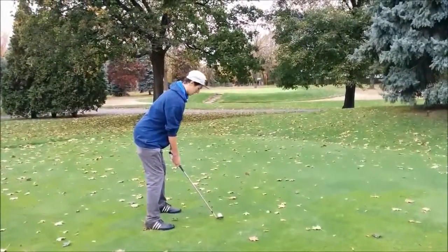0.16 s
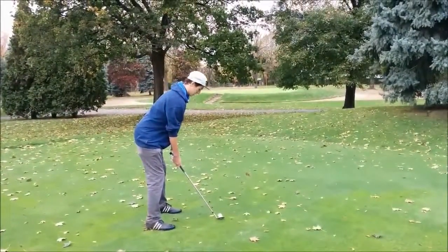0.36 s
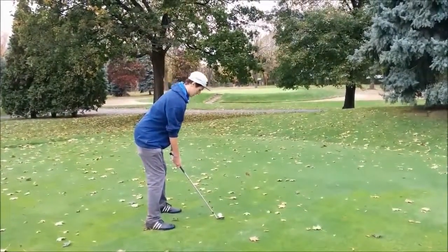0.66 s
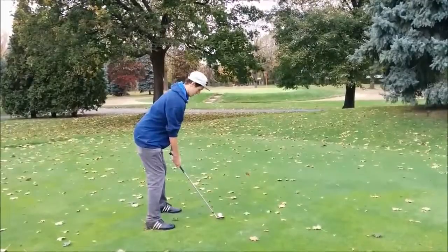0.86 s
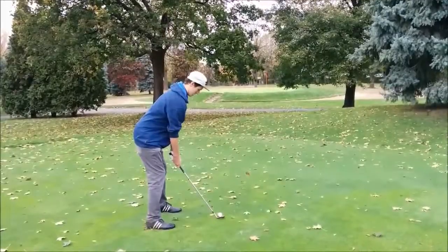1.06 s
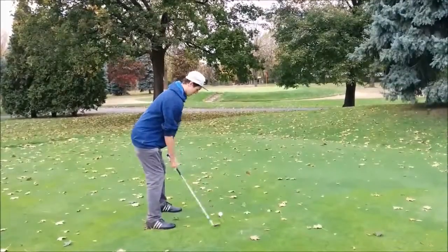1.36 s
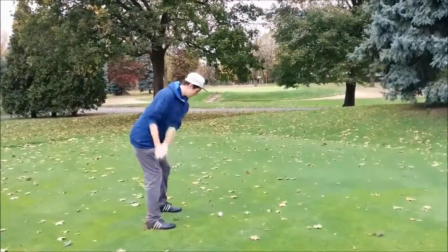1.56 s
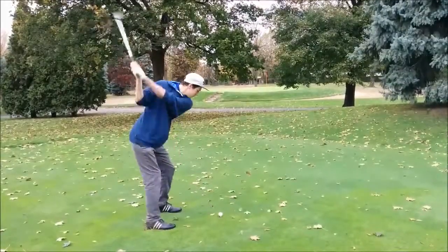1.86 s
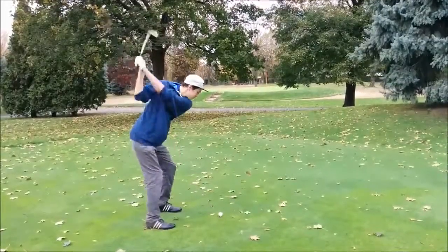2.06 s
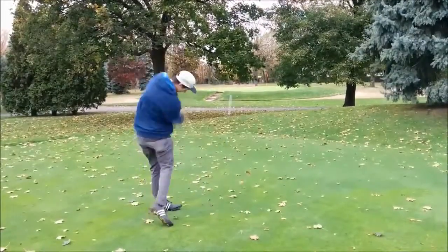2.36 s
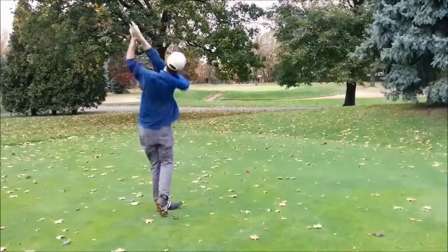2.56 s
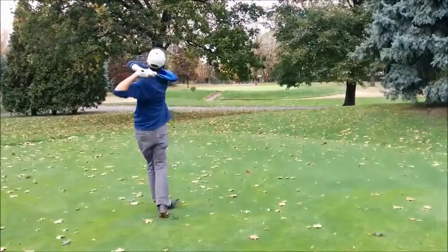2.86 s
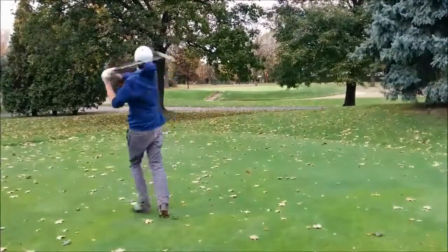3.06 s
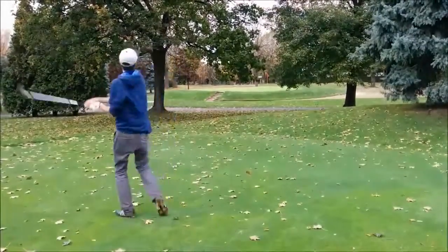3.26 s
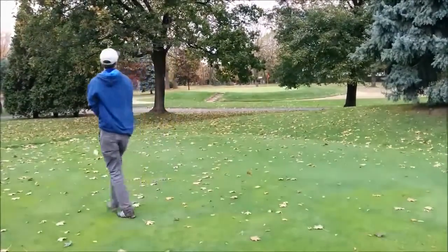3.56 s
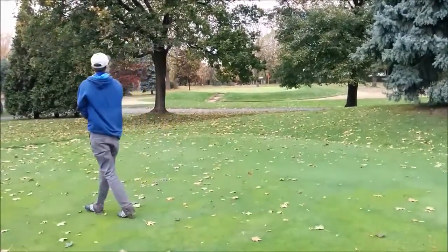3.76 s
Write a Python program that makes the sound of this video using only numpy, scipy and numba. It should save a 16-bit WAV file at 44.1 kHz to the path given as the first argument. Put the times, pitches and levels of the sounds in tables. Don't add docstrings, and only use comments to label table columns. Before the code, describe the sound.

A golf ball is struck with a hard bright crack in gusty wind, then knocks wood

```python
import sys
import numpy as np
from scipy import signal
from scipy.fft import rfft, irfft
from scipy.io import wavfile
from scipy.ndimage import uniform_filter1d
from numba import njit

SR = 44100
rng = np.random.default_rng(int(sys.argv[2]) if len(sys.argv) > 2 else 0)


def voltage_ratio(level):
    return 10 ** (np.asarray(level, float) / 20)


def unload_wav(signal):
    wavfile.write(
        sys.argv[1],
        SR,
        np.round(np.clip(np.atleast_2d(signal).T, -1, 1) * 32767).astype(np.int16),
    )


N = 171990
LULL_DB = -46.5


@njit
def svf(x, hz, share):
    y, band_state, low_state = np.empty(len(x)), 0., 0.
    for i in range(len(x)):
        g = np.tan(np.pi * hz[i] / SR)
        v = (band_state + g * (x[i] - low_state)) / (1 + g * (g + share))
        band_state, low_state = 2 * v - band_state, low_state + 2 * g * v
        y[i] = share * v
    return y


def band(x, hz, share):
    centre = np.clip(hz + np.zeros(len(x)), 20, .45 * SR)
    y = svf(x, centre, float(max(share, .02)))
    return y / np.std(y)


def curve(rows):
    return np.interp(np.arange(N) / SR, [r[0] for r in rows], [r[1] for r in rows])


def coloured(points):
    hz, db = np.array(points).T
    log_hz = np.log(np.arange(N // 2 + 1) * SR / N + 1)
    gain = voltage_ratio(np.interp(log_hz, np.log(hz), db, left=-120))
    y = irfft(rfft(rng.standard_normal(N)) * gain, N)
    return y / np.std(y)


def walk(rate):
    k = int(SR / rate)
    steps = np.repeat(rng.standard_normal(N // k + 1), k)
    return 1.4 * uniform_filter1d(uniform_filter1d(steps, k), k)[:N]


def add(out, s, x):
    i = int(s * SR)
    out[i:i + len(x)] += x[:N - i]


def burst(db, hz, share, t60, rise=.001):
    t = np.arange(8000) / SR
    grain = voltage_ratio(4 * uniform_filter1d(np.repeat(rng.standard_normal(80), 100), 100))
    noise = band(band(rng.standard_normal(len(t)), hz, share), hz, share)
    noise = band(noise, hz, 2 * share)
    return voltage_ratio(db - 60 * t / t60) * (1 - np.exp(-t / rise)) * grain * noise


def ring(modes, t):
    out = np.zeros(len(t))
    for k, (hz, db, t60) in enumerate(modes):
        sign = (-1) ** max(k, 1)
        out += sign * voltage_ratio(db - 60 * t / t60) * np.sin(2 * np.pi * hz * t)
    return out


# frequency_hz, level_db (per Hz)
PARK_SPECTRUM = [(300, -8), (900, -9.5), (1750, -30.5), (4200, -41.5), (7700, -34), (16000, -36.5)]


def park():
    return voltage_ratio(-65.5 + 2.0 * walk(2)) * coloured(PARK_SPECTRUM)


# start_s, length_s, level_db
GUST_TIMES = [(0.019, 0.095, -32), (0.118, 0.038, -19.5), (0.168, .11, -22.5), (0.308, .055, -26.5),
              (0.401, 0.075, -16), (0.478, 0.15, -30.5), (0.527, 0.044, -21.5), (0.637, 0.094, -30.5),
              (0.764, .07, -39), (0.917, 0.19, -19.5), (0.968, 0.031, -18), (1.125, 0.055, -20.5),
              (1.243, 0.032, -25), (1.301, 0.19, -21), (1.498, .04, -40), (1.546, 0.15, -32.5),
              (1.627, .03, -21.5), (1.696, .02, -32.5), (1.727, 0.27, -22.5), (1.926, 0.082, -23),
              (2.004, 0.19, -26.5), (2.319, 0.035, -21), (2.38, 0.085, -25.5), (2.477, 0.14, -22),
              (2.639, 0.24, -22.5), (2.886, 0.14, -29), (3.03, 0.06, -44), (3.144, 0.067, -23),
              (3.219, 0.3016, -25), (3.399, .06, -27.5), (3.601, 0.07, -28), (3.782, 0.045, -31.5),
              (3.88, .03, -29)]


def gust_strength():
    edge_s = 0.02
    t = np.arange(N) / SR
    gust = voltage_ratio(LULL_DB) + 0 * t
    for s, long, db in GUST_TIMES:
        inside = np.minimum(t - s, 1.8 * (s + long - t)) / edge_s
        gust = gust + voltage_ratio(db) * np.clip(inside + 0.56, 0, 1) ** 2
    return gust


def eddy(ms):
    u = np.arange(-600, 601) / SR / (ms * 0.67 / 1000)
    return -np.exp(-.5 * u ** 2) * (1 - .5 * u ** 2)


def eddy_swarm(gust):
    eddies_per_s, spread_db = 230, 5
    chance = rng.random((N, 2)).T
    depth_db = np.minimum(-spread_db * np.log(1 - chance[1]), 11)
    spikes = (chance[0] < eddies_per_s / SR) * voltage_ratio(depth_db)
    centre_hz = 202 * 2 ** (.3 * walk(25.009)) * (gust / voltage_ratio(-20)) ** .22
    swarm = band(np.convolve(spikes, eddy(1.27), "same"), centre_hz, 1.12)
    swarm = band(swarm, centre_hz, 1.12)
    rumble = band(band(rng.standard_normal(N), 85, 1.5), 85, 1.5) * voltage_ratio(2.4 * walk(30.2))
    return gust * (voltage_ratio(-4.5) * swarm + voltage_ratio(-3.5) * rumble)


# centre_s, depth_db, width_ms
SINGLE_EDDIES = [(0.1289, -5, 1.03), (0.1791, -3, 0.93), (0.236, -10.5, 1.4), (0.4104, -9.5, 0.79),
                 (0.4166, -7.5, 3.5), (0.4205, -2.4, 1.36), (0.4295, -11.5, 2.7), (0.4451, -9, 1.5),
                 (0.467, -7.5, 0.75), (0.5373, -11.5, 1.7), (0.5432, -5.5, 1.24), (0.556, -10, 0.72),
                 (0.5624, -9.5, 0.88), (0.6573, -11, 1.04), (0.696, -14.5, 1.3), (0.961, -10.5, 1.01),
                 (0.9793, -8.5, 2.5), (0.986, -4.5, 3.6), (1.0069, -9.5, 1.09), (1.0497, -12, 1.9),
                 (1.0613, -12, 1.17), (1.1404, -9.5, 1.29), (1.333, -9.5, 2), (1.4492, -6.5, 1.46),
                 (1.462, -4, 0.94), (1.7561, -11, 0.57), (1.8022, -8, 1.35), (1.8092, -14.5, 0.91),
                 (1.89, -11.5, 1.1), (1.9038, -5.5, 1.17), (1.9537, -6.5, 1.07), (1.9653, -5, 0.98),
               (1.9716, -17, 1), (2.3276, -8.5, 1.11), (2.495, -28, 0.99), (2.5415, -18, 1),
               (2.5545, -8, 0.97), (2.561, -10, 1.55), (2.7082, -12.5, 1.27), (2.724, -15.5, 3),
               (2.778, -13, 2.05), (2.7899, -11, 0.94), (2.8282, -15.5, 1.07), (2.8344, -8.5, 1.63),
               (2.9064, -7.5, 1.23), (2.9539, -7, 1.23), (3.1512, -14.5, 0.79), (3.1669, -10, 1.35),
               (3.1712, -16, 2.4), (3.2347, -14, 1.3), (3.278, -14.5, 1.13), (3.3118, -7, 1.73),
               (3.3222, -4, 1.56), (3.4914, -8.5, 2.03), (3.6238, -9.5, 1.3), (3.635, -11, 1.35),
                 (.229, -19.5, 1.4), (0.4242, -5.5, 1.8), (0.4556, -15, 1.3), (0.5489, -12, 3.9),
               (0.5655, -13, 2.2), (1.0156, -13.5, 2.1), (1.3157, -15.5, 1.45), (1.4419, -14, 1.1),
               (1.6348, -20, 1.23), (1.6428, -17.5, 1.85), (1.6458, -21, 1.8), (1.8404, -17.5, 1.35),
               (1.8687, -16, 2.4), (1.9392, -14, 1.4), (1.9413, -12.5, 0.96), (1.948, -14, 2.4),
               (2.1039, -17.5, 1.55), (2.14, -17.5, 2.4), (2.1475, -15.5, 1.76), (2.1514, -16.5, 1.3),
               (2.5715, -16.5, 0.83), (2.7845, -13, 2.4), (3.161, -15.5, 1.3), (3.4113, -16.5, 1.4),
               (3.434, -14.5, 2.15)]


def single_eddies():
    out = np.zeros(N)
    for s, db, ms in SINGLE_EDDIES:
        add(out, s - 600 / SR, voltage_ratio(db + 5.5) * eddy(ms))
    return out


# centre_s, level_db, pitch_hz, length_s
EDGE_FLUTTERS = [
    (.231, -10.5, 766, 0.00067),
    (1.364, -26, 717, 0.0022),
    (1.643, -25.5, 656, 0.004),
    (1.757, -15.5, 713, 0.0032),
    (1.929, -22, 790, 0.0015),
]


def flutters():
    out = np.zeros(N)
    u = np.arange(-600, 601) / SR
    for s, db, hz, long in EDGE_FLUTTERS:
        add(out, s - 600 / SR, -voltage_ratio(db - 10 * (u / long) ** 2) * np.cos(2 * np.pi * hz * u))
    return out


def warble(felt):
    streaks = np.zeros(N)
    for hz in 700 * 2 ** (np.arange(7) / 5):
        level = voltage_ratio(9 * walk(21.886) - 25 * np.log2(hz / 900) ** 2)
        streaks += level * band(rng.standard_normal(N), hz * (1 + 0.046 * walk(8)), 0.045)
    return voltage_ratio(-55) * felt ** 0.56 * streaks


# frequency_hz, level_db (per Hz)
HISS_SPECTRUM = [(410, -24.5), (700, -8), (934, -5), (1480, -32.5), (1730, -29.5), (3890, -29),
                 (4320, -56.5), (7490, -33.5), (16000, -60.5)]


def wind():
    thumps = eddy_swarm(gust_strength()) + single_eddies() + flutters()
    thumps = signal.sosfilt(signal.butter(2, 1320, fs=SR, output="sos"), thumps)
    felt = np.minimum(uniform_filter1d(np.abs(thumps), 1600) + voltage_ratio(LULL_DB), voltage_ratio(-19.5))
    hiss = voltage_ratio(-41.5 + 3.4 * walk(25)) * felt ** 0.72 * coloured(HISS_SPECTRUM)
    return thumps + hiss + warble(felt)


# start_s, level_db, centre_hz, width_share, t60_s
SHORT_TICKS = [
    (.1785, -34, 2500, 2.6, .002),
    (.4664, -33.5, 2490, 2.5, .002),
    (1.067, -48, 4500, 1.3, 0.034),
]
# pitch_hz, level_db, t60_s
SNAP_MODES = [(2900, -14, .03), (4800, -8, .02), (5900, -5, .0035), (8100, -2, .004), (10200, 1, .0035),
              (12600, -1, .003), (15400, -2, .0035)]


def ticks():
    out = np.zeros(N)
    for s, db, hz, share, t60 in SHORT_TICKS:
        add(out, s, burst(db, hz, share, t60, 0.00026))
    t = np.arange(1500) / SR
    contact = (1 - np.exp(-t / .0003)) / (1 + (t / .0021) ** 6)
    add(out, 1.0673, voltage_ratio(-23) * ring(SNAP_MODES, t) * contact)
    return out


def swish(rows, peaks):
    t = np.arange(N) / SR
    air = np.zeros(N)
    for hz, share, db in peaks:
        noise = band(band(rng.standard_normal(N), hz, share), hz, share)
        air += voltage_ratio(db + 2.5 * walk(150)) * band(noise, hz, share)
    fade = np.clip(np.minimum(t - rows[0][0], rows[-1][0] - t) / .01 + 1, 0, 1)
    return air * voltage_ratio(curve(rows)) * fade


# time_s, level_db
IN_LEVEL = [
    (2.52, -86),
    (2.56, -60),
    (2.595, -38.5),
    (2.612, -43),
    (2.625, -41.5),
]
# centre_hz, width_share, level_db
IN_PEAKS = [(1300, .5, 3), (2120, 0.67, 2.5), (3900, 0.64, -11), (5560, .3, -9), (11000, .8, -24)]


def swing_in():
    return swish(IN_LEVEL, IN_PEAKS)


# pitch_hz, level_db, t60_s
HEAD_MODES = [(924, -4, .05), (1185, -5, .05), (1600, -4.5, 0.017), (1940, -2.5, 0.02), (2300, -5, .018),
              (2720, -3.5, 0.013), (3400, -10, 0.0081), (5650, -2.5, .011), (6190, -1.5, 0.0089),
              (7780, -10, .013), (9100, -12, .012)]


def strike():
    start_s, shaft_late_s, shaft_long_s = 2.6236, .0066, .0023
    t = np.arange(3000) / SR
    head = ring(HEAD_MODES, t) / (1 + (t / .0052) ** 6)
    head = voltage_ratio(-0.5) * head * (1 - np.exp(-t / 0.00037)) / 2
    shaft = voltage_ratio(-21) * np.exp(-.5 * ((t - shaft_late_s) / shaft_long_s) ** 2)
    shaft = shaft * np.sin(2 * np.pi * 3920 * t)
    out = np.zeros(N)
    add(out, start_s, head + shaft)
    add(out, start_s, burst(-19, 6000, 2.4, 0.021, .0002))
    return out


# time_s, level_db
SPRAY_LEVEL = [
    (2.63, -52),
    (2.639, -56.5),
    (2.653, -59.5),
    (2.665, -55.5),
    (2.759, -70.5),
    (2.86, -74.5),
    (2.89, -69.5),
    (3.03, -81),
    (3.06, -91.5),
]
# frequency_hz, level_db (per Hz)
SPRAY_SPECTRUM = [(5500, -19), (7500, -1), (9000, -1.5), (11000, -3.5), (14000, -7), (16500, -9.5)]


def spray():
    t = np.arange(N) / SR
    return (t > SPRAY_LEVEL[0][0]) * voltage_ratio(curve(SPRAY_LEVEL) + 2 * walk(90)) * coloured(SPRAY_SPECTRUM)


# time_s, level_db
OUT_LEVEL = [
    (2.64, -53),
    (2.654, -70),
    (2.668, -50),
    (2.686, -49),
    (2.694, -42.5),
    (2.725, -41.5),
    (2.75, -50),
    (2.775, -60),
    (2.80, -58.5),
]
# centre_hz, width_share, level_db
OUT_PEAKS = [(1780, 0.74, 2.5), (2600, .4, -2), (3500, .3, -6.5), (4500, 0.33, -1.5), (6550, 0.16, -15.5)]


def swing_out():
    return swish(OUT_LEVEL, OUT_PEAKS)


# start_s, level_db, centre_hz, t60_s
TREE_ECHOES = [(2.8003, -41, 2900, 0.094), (2.811, -47, 2000, .08), (2.8509, -40.5, 3240, 0.054),
               (2.879, -54, 3000, .05), (2.8997, -52, 2360, 0.25), (2.9558, -47.5, 2900, 0.11),
               (2.9823, -53, 3120, 0.047), (3.009, -61.5, 2900, 0.035), (3.024, -57.5, 2990, 0.066),
               (3.0334, -60, 3040, .04), (3.3233, -51.5, 2600, .05), (3.363, -55, 2600, .06)]


def trees():
    t = np.maximum(np.arange(N) / SR - 2.6236, 0)
    out = (t > 0) * voltage_ratio(-47 - 60 * t / 1) * band(rng.standard_normal(N), 1500, 0.44)
    for s, db, hz, t60 in TREE_ECHOES:
        add(out, s, burst(db, hz, 0.57, t60, 0.00074))
    return signal.sosfilt(signal.butter(6, (1300, 4700), "band", fs=SR, output="sos"), out)


# start_s, level_db, centre_hz, width_hz, t60_s
BRANCH_KNOCKS = [(3.2195, -49.5, 12800, 5200, .02), (3.19, -67, 8500, 7560, .9),
                 (3.221, -36.5, 5900, 2600, 0.079), (3.221, -44.5, 3960, 500, 0.16),
                 (3.221, -41.5, 2460, 500, 0.088), (3.249, -50, 4500, 5000, 0.035),
                 (3.2605, -26, 3660, 1600, 0.03), (3.264, -46, 4140, 350, 0.068),
                 (3.369, -51.5, 4020, 400, .07), (2.905, -59.5, 5360, 1210, .14),
                 (3.262, -40.5, 2300, 1100, 0.069)]


def knocks():
    out = np.zeros(N)
    for s, db, hz, width, t60 in BRANCH_KNOCKS:
        add(out, s, burst(db, hz, width / hz, t60, .002))
    return out


def scene():
    air = park() + wind() + ticks()
    club = swing_in() + strike() + spray() + swing_out()
    return (air + club + trees() + knocks())[None]


def low_pass(x):
    return signal.sosfilt(signal.butter(12, 16670, fs=SR, output="sos"), x)


def record(dry):
    x = signal.sosfilt(signal.butter(3, 64.8, "high", fs=SR, output="sos"), dry)
    t = np.arange(N) / SR - 1.3229
    held = np.clip(1 + t / .003, 0, 1) ** 2 * (t < 0)
    back = np.where(t < 0, 1, np.clip((t - .0068) / .002, 0, 1))
    x = x * (1 - held) * back + voltage_ratio(-24) * held
    x = x / (1 + (x / .95) ** 10) ** .1
    return low_pass(x)


dry = scene()
out = record(dry)
unload_wav(out)
```